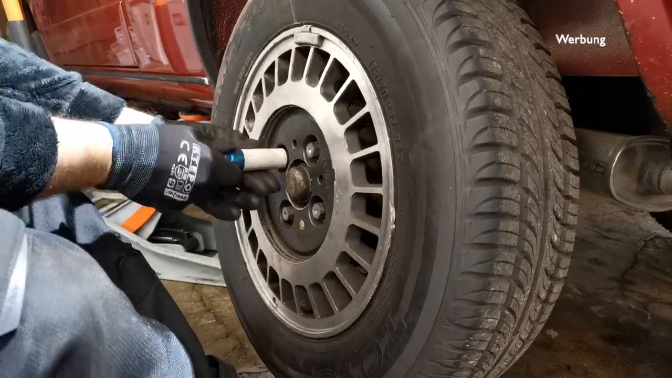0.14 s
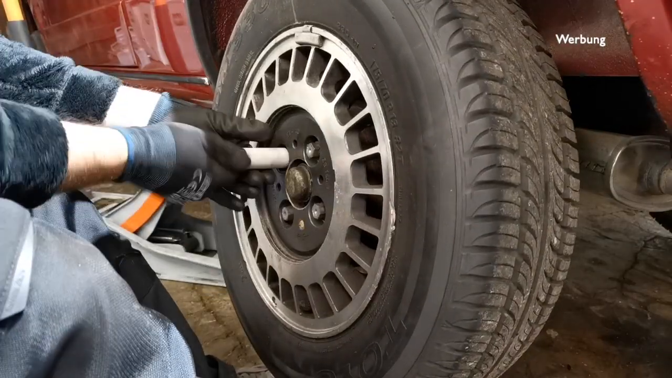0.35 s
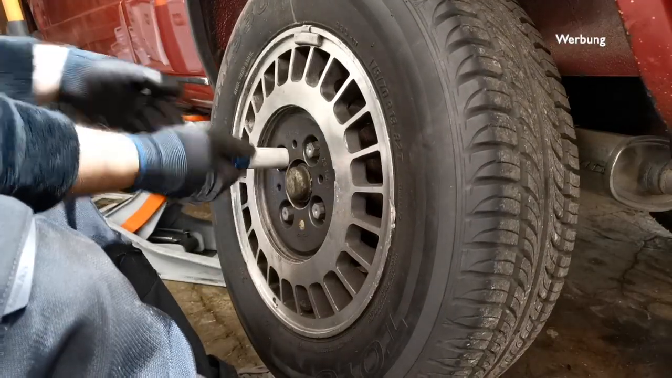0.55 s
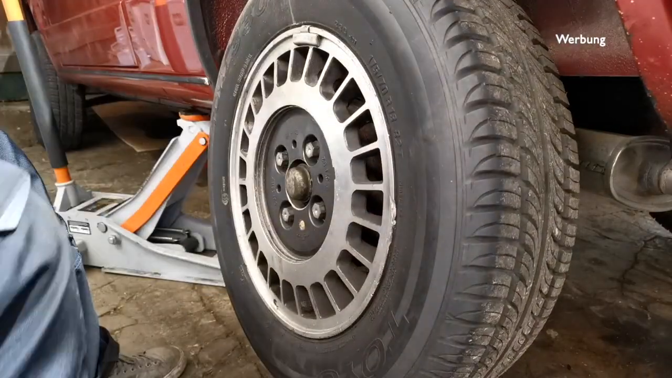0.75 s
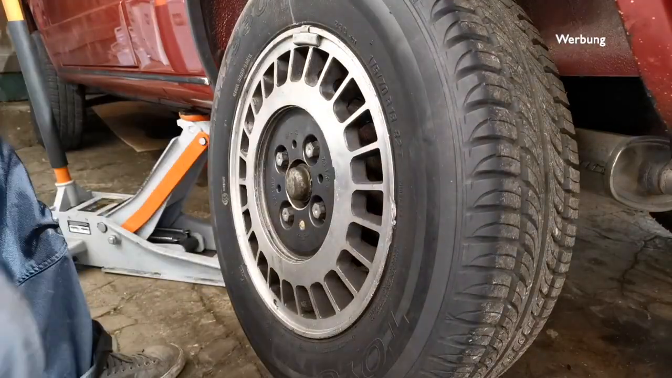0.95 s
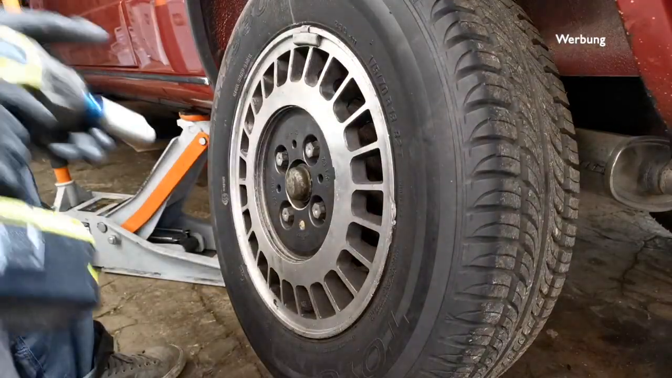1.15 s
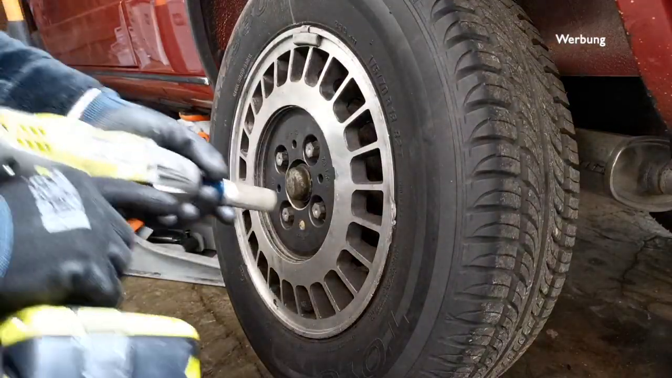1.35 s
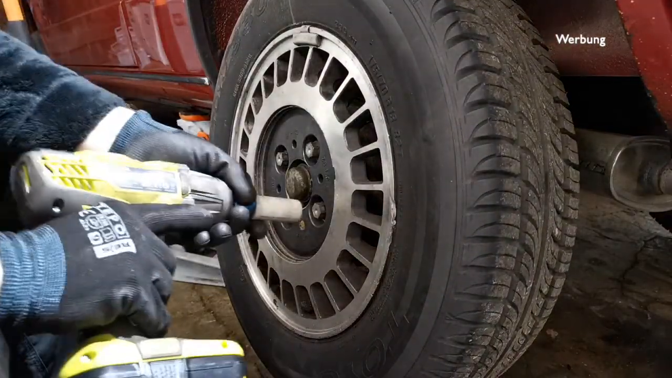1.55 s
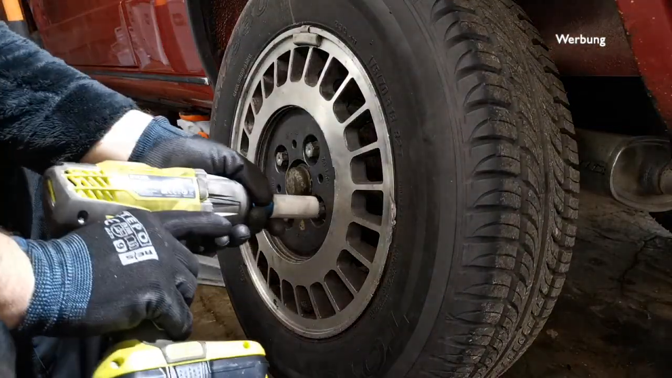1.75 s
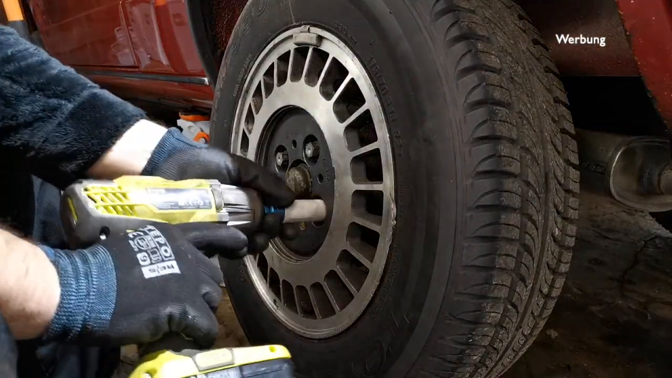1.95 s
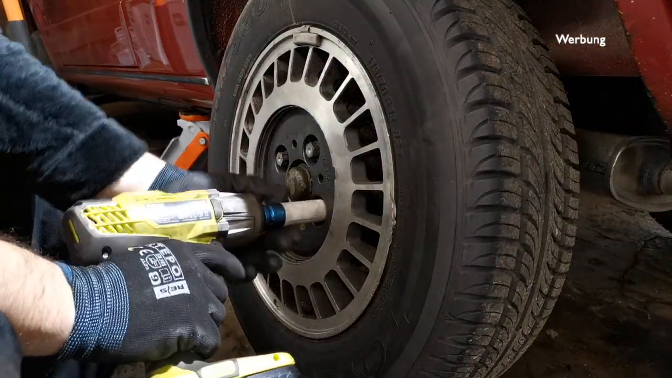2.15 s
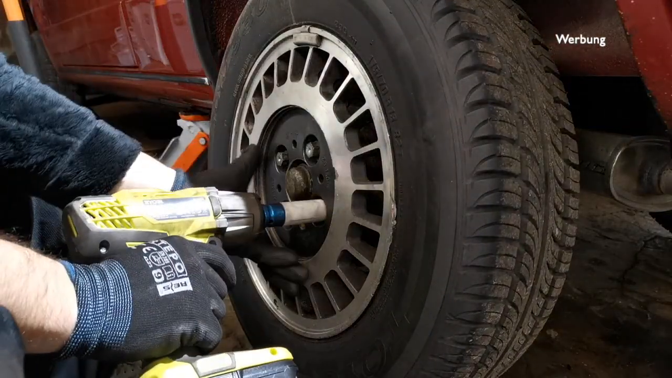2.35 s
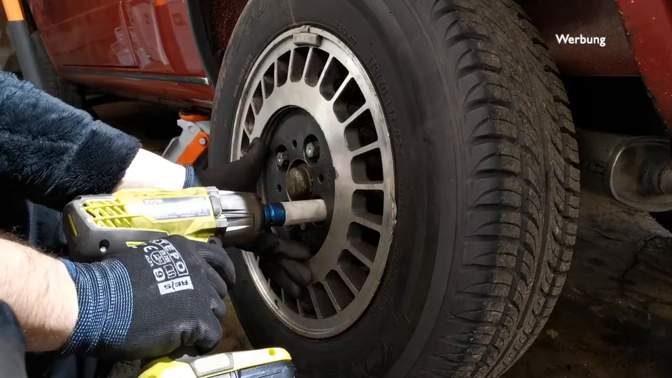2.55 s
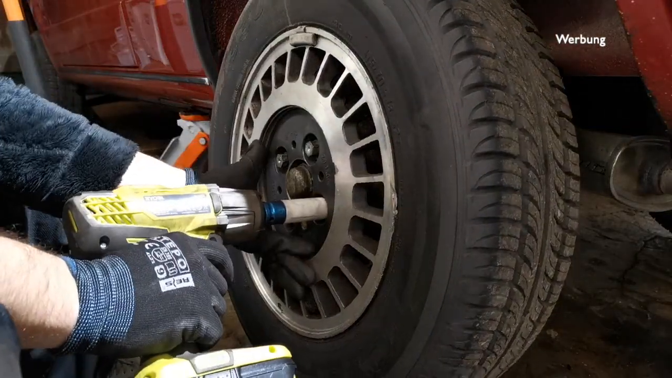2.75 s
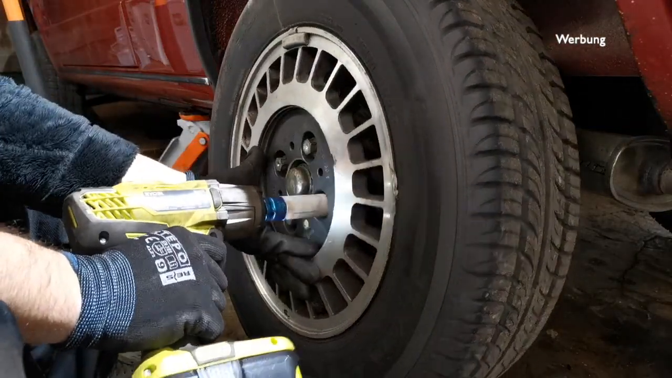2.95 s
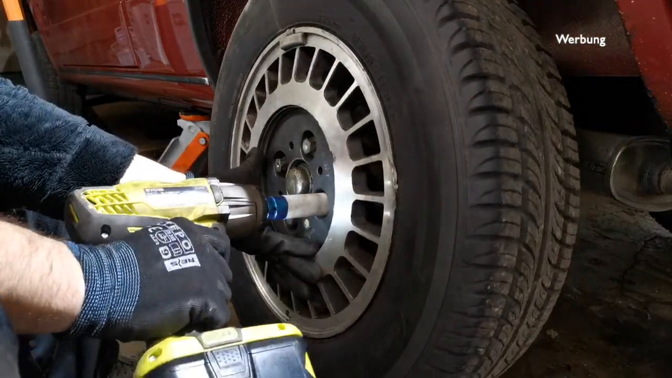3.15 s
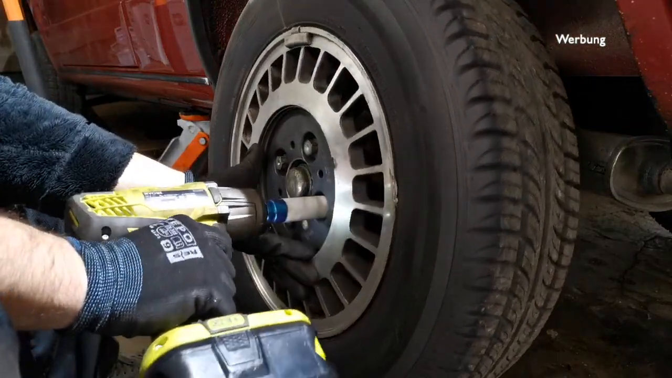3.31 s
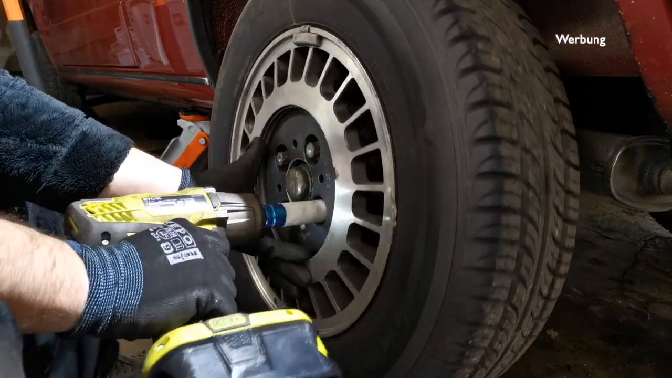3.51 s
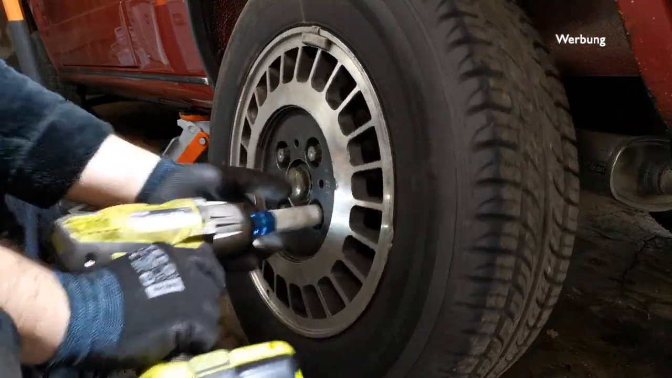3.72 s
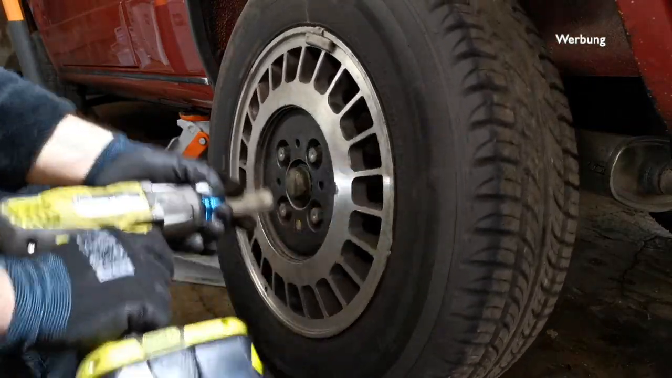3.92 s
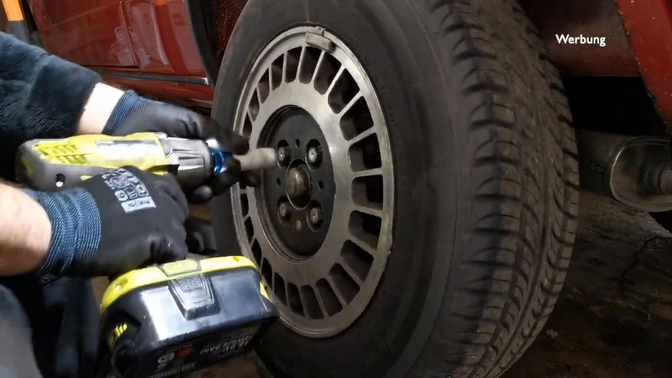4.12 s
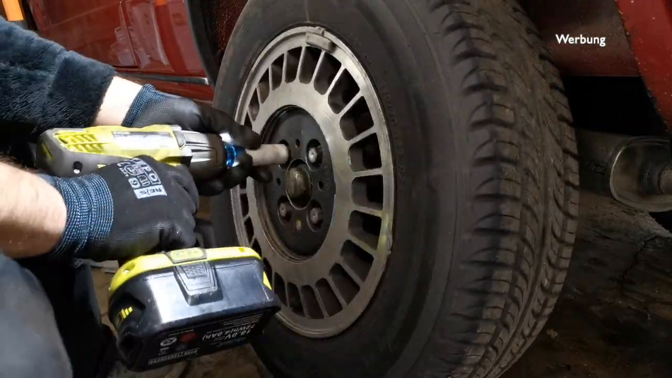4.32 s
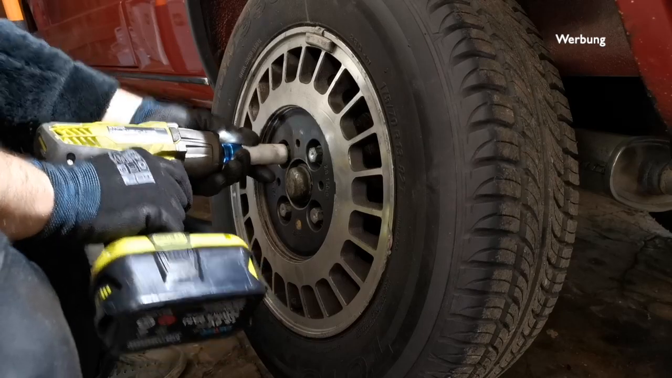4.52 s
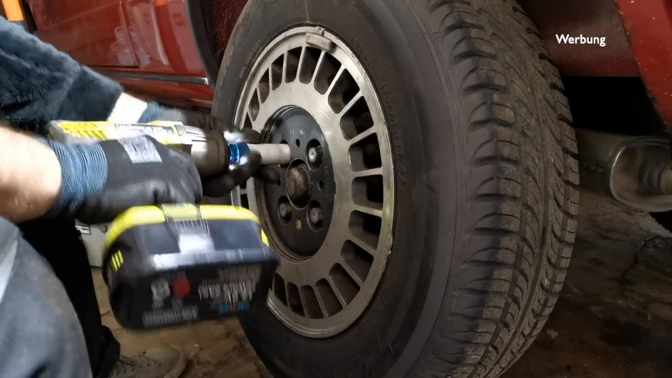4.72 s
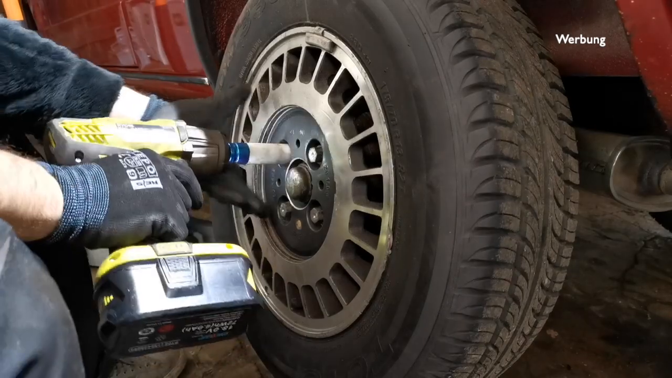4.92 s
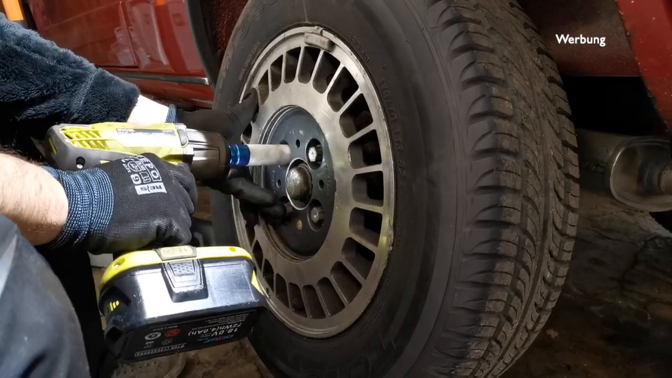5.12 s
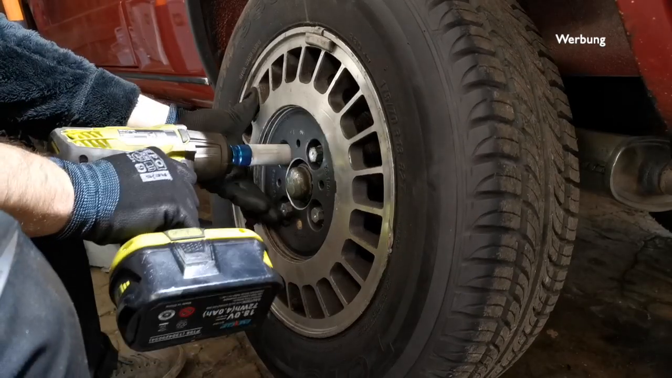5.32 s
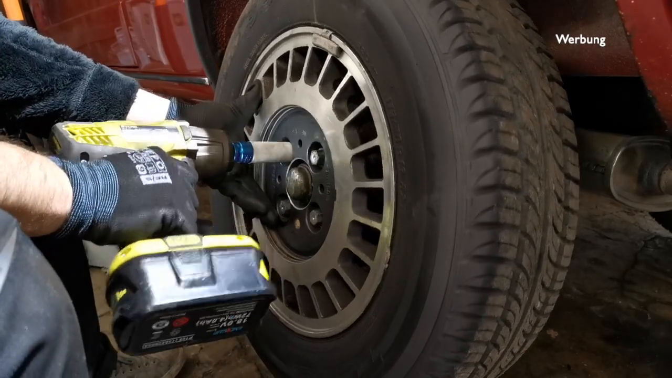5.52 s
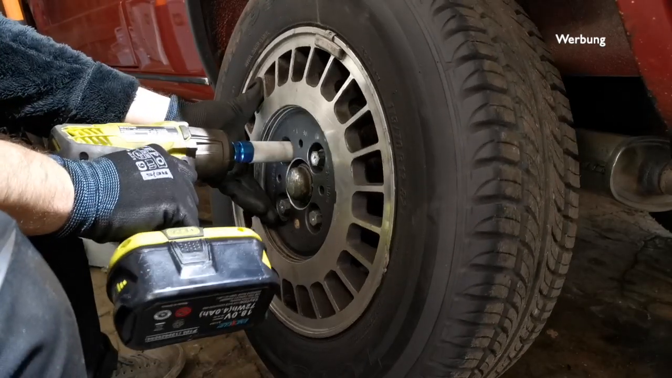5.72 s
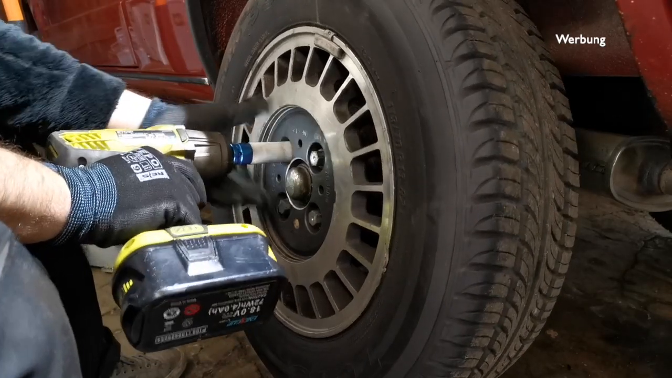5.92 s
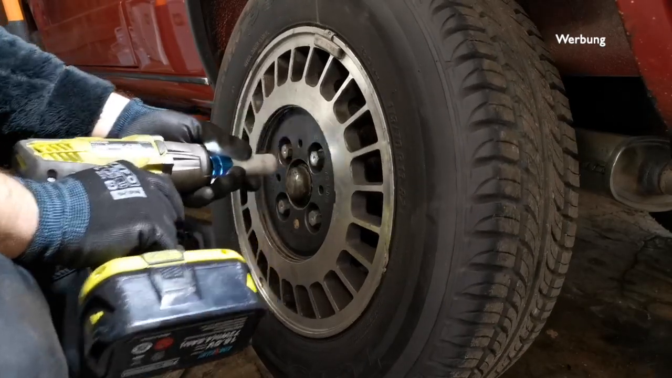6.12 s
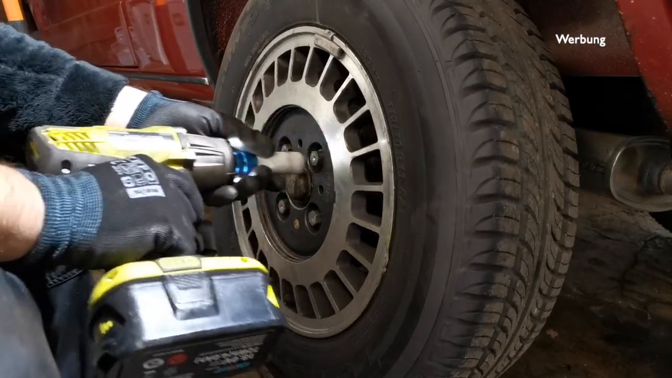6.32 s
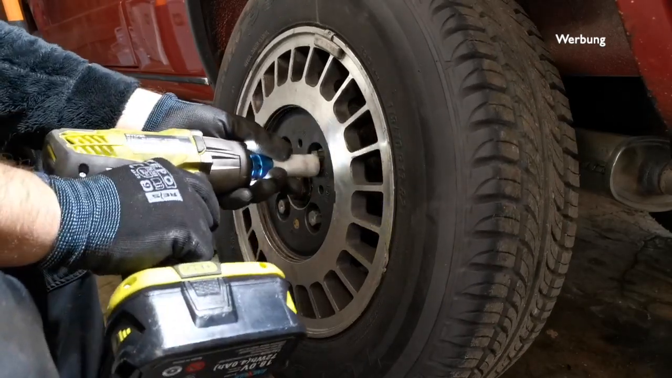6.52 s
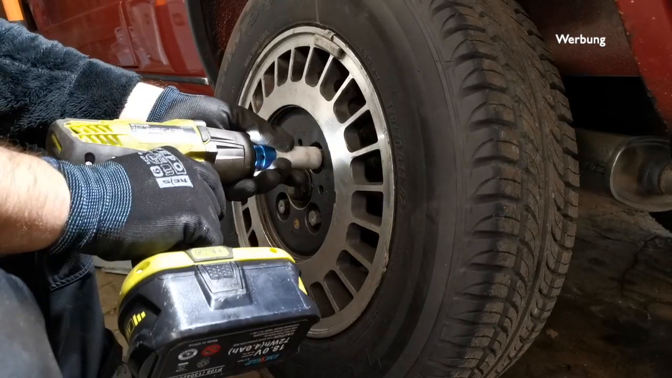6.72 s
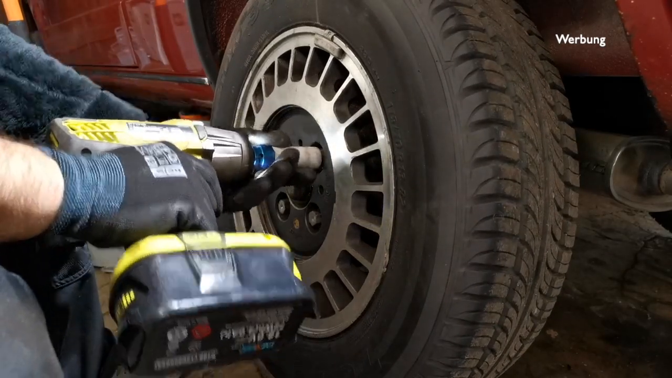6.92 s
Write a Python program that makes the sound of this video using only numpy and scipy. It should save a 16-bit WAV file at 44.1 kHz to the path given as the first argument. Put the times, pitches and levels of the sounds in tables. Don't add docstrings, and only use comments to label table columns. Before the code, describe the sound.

Faint finger ticks, a socket clinking into place, then a cordless impact wrench whirs and hammers harshly twice, with tool clatter between bursts.

```python
import sys
import numpy as np
from scipy import signal
from scipy.fft import rfft, irfft, next_fast_len
from scipy.io import wavfile
from scipy.ndimage import map_coordinates

SR = 44100
rng = np.random.default_rng(int(sys.argv[2]) if len(sys.argv) > 2 else 0)


def waveform_to_disk(signal):
    frames = np.transpose(np.atleast_2d(signal))
    scaled = np.clip(frames, -1, 1) * 32767
    samples = np.round(scaled).astype(np.int16)
    wavfile.write(sys.argv[1], SR, samples)


def field_ratio(decibels):
    return 10 ** (np.asarray(decibels, dtype=float) / 20)


N = 311346
CHANGE_S = 1.037

# f/Hz, density/dB per Hz
QUIET_SPECTRUM = [(25, -12), (60, -8), (145, -4.5), (230, -10), (320, -2.5), (600, -6), (900, -7),
                  (2000, -11), (5000, -9), (12000, -8.5), (16000, -9.5)]
# t/s, level/dB
HISS_LEVEL = [(0, -72), (.25, -71), (.35, -70.5), (.65, -70), (1.0, -70)]
# f/Hz, level/dB
BALLAST_TONE = [(12947, -94)]

# f/Hz, density/dB per Hz
TRAFFIC_SPECTRUM = [(15, -21.5), (30, -2), (60, -1), (100, -9.5), (114, -3), (130, -7), (160, -6),
                    (250, -14.5), (500, -38.5)]
# t/s, level/dB
TRAFFIC_LEVEL = [(1.0, -83), (1.3, -77), (1.8, -72), (2.05, -76), (2.55, -71), (2.9, -78.5), (4.4, -72.5),
                 (4.95, -75.5), (6.0, -70), (6.4, -76), (7.06, -78.5)]
# f/Hz, level/dB, unsteadiness/dB
FRIDGE_HUM = (113, -81, 2.5)
# f/Hz, density/dB per Hz
AIR_SPECTRUM = [(120, -29), (200, -2.5), (334, -6.5), (424, 0), (473, -7), (548, -2), (1620, -2.5),
                (15100, -27), (16000, -27.5)]
AIR_DB, AIR_FOLLOWS, CALM_DB = -69, 0.3, -76

# f/Hz, density/dB per Hz
CLOTH_SPECTRUM = [(180, -32.5), (300, -7), (448, -9), (1120, -4), (1220, -3), (3140, -6), (6580, -8),
                  (14000, -22)]
# t/s, level/dB
ARM_MOTION = [(1.0, -63.5), (1.5, -67), (1.8, -73), (2.15, -70), (2.35, -68), (2.55, -74.5), (4.2, -77),
              (4.65, -69), (4.95, -75.5), (5.2, -74), (7.06, -79)]
# f/Hz, density/dB per Hz
SLEEVE_SPECTRUM = [(2000, -39), (6000, -7), (12500, 1), (16000, -1.5)]
SLEEVE_DB, SLEEVE_FOLLOWS, STILL_DB = -86, 0.5, -76
# t/s, half length/s, level/dB
SLEEVE_PASS = (2.36, .09, -75)

# f/Hz, t60/s
GARAGE_DECAY = [(35, .8), (70, 0.5), (250, 0.69), (500, .6), (2700, 0.59), (5400, 0.51), (8000, 0.44),
                (11000, .36), (13500, 0.3), (16000, .31)]
TAIL = int(0.9 * SR)

# t/s, peak level/dB, centre f/Hz, width/octaves
FINGER_TICKS = [(.047, -62, 11500, .3), (.148, -58, 13500, .5), (.26, -63, 12000, .8), (.295, -69, 870, .2),
                (.31, -65, 2000, 0.1474), (.36, -74, 315, 0.057), (.41, -71, 880, .5), (.47, -68, 900, .5),
                (.6, -66, 850, .54), (.646, -61, 2300, .67), (.66, -58, 9000, 1.1),
                (.708, -53, 3500, 1.262), (.712, -65, 1040, .3), (.78, -69, 495, 0.0565),
                (.793, -62, 3500, 1.6), (.827, -52, 12760, 0.9), (.9, -54, 5960, 1.9),
                (.932, -43.5, 8950, 2.8), (.933, -76, 400, 0.72), (.97, -62, 7000, 1.2)]
# t/s, peak level/dB, centre f/Hz, width/octaves
SOCKET_FITTING = [(1.063, -51.5, 6500, 0.58), (1.135, -54, 6500, 0.7), (1.29, -57, 6300, .4),
                  (1.455, -55, 2200, .9), (1.527, -35.5, 3400, 1.3), (1.529, -44, 13000, 0.78),
                  (1.535, -44.5, 8210, .25), (1.855, -44.5, 1780, 1.1), (1.862, -52, 3300, .6),
                  (1.88, -45, 2500, 0.26), (1.885, -47.5, 1040, 0.93), (1.92, -52, 1500, 1.5),
                  (1.96, -47, 884, 1.8), (2.481, -50, 4500, 1.7), (2.884, -53, 7500, 0.55),
                  (2.9, -63, 5450, .3)]
# t/s, peak level/dB, centre f/Hz, width/octaves
BURST_JOLTS = [
    (3.05, -36, 156, .3),
    (3.229, -19.5, 10970, .9),
    (5.34, -35.5, 150, 0.39),
    (5.5, -32.5, 152, .35),
    (5.591, -23.5, 11000, 0.76),
]
# t/s, peak level/dB, centre f/Hz, width/octaves
TOOL_SHIFTING = [(4.2975, -43, 1700, 1.3), (4.3124, -36, 1200, 1.4), (4.32, -42, 3400, 0.34),
                 (4.319, -44, 6100, 0.32), (4.313, -55, 8370, 0.6), (4.3135, -52, 13500, .5),
                 (4.32, -54, 141, 0.48), (4.33, -35.5, 1150, 1.1), (4.507, -58, 8302, 0.28),
                 (4.508, -56.5, 3500, 1), (4.6, -51.5, 1097, 0.78), (4.765, -53.5, 5500, 1.2),
                 (4.794, -52, 8310, .25), (4.946, -54, 600, 1.2), (4.975, -61, 400, 1.1),
                 (4.995, -60, 350, 1.2), (5.173, -50.5, 5960, .6), (6.465, -59, 481, 0.37),
                 (6.56, -57, 300, 0.91), (6.6268, -51, 1800, 1.1), (6.6505, -51, 1200, 0.87),
                 (6.651, -51, 3010, 1.2), (6.665, -62, 2800, 0.9)]
# f/Hz, level/dB
SCRAPE_LEVEL = [(200, -32.5), (1000, -20), (2500, -15.5), (5000, -12), (12000, -12.5)]
RING_CYCLES = 8.2
# t/s, peak level/dB, f/Hz, t60/s
STRUCK_PARTS = [(4.301, -47, 770, .04), (4.313, -41, 663, .065), (4.313, -42, 1754, 0.042),
                (4.313, -46, 3800, 0.024), (4.313, -44, 6000, 0.023), (4.313, -50, 8300, .02),
                (4.319, -49, 6100, 0.027), (4.324, -41, 1030, 0.082), (4.328, -49, 1570, 0.035),
                (4.341, -43, 1250, .06), (4.372, -46, 1190, .03), (4.95, -61, 140, .07),
                (4.952, -53, 720, 0.044), (4.953, -60, 320, 0.046), (4.965, -55, 778, .035),
                (4.985, -58, 898, 0.036), (4.994, -61, 302, 0.038), (5.005, -61, 740, .04),
                (5.609, -19.5, 900, .05), (6.627, -48, 1400, 0.055), (6.632, -59, 2450, .04),
                (6.651, -49.5, 1300, 0.058), (6.651, -57, 2800, 0.034), (6.651, -62, 4600, 0.031),
                (6.657, -49.5, 1043, 0.066), (6.665, -52, 1102, 0.037), (6.677, -57, 1450, .05),
                (6.677, -59, 2500, .04), (6.695, -56, 1290, .05)]

# f/Hz, t60/s, levels at each bolt/dB
TYRE_CAVITY = (252, 2.1, [-84.5, -77])
# t/s, peak level/dB, f/Hz
SPOKE_BLOWS = [
    [(3.0144, -12.5, 2790), (3.0383, -6, 3790), (3.0757, -8, 2796), (3.0887, -6, 3520), (3.1351, -7, 3740), (3.1516, -4.5, 2510), (3.2194, -12, 2590), (3.2359, -7, 2640), (3.2643, -2.5, 4580), (3.2902, -5, 3680), (3.3386, -3, 2833), (3.3626, -2, 2390), (3.4469, -5, 2930), (3.4833, -5.5, 4340), (3.5117, -2, 4550), (3.5382, -4, 4570), (3.5651, -3.5, 3410), (3.5826, -2.5, 3550), (3.6045, -1.5, 4270)],
    [(5.3343, -4.5, 2650), (5.3548, -3, 1820), (5.3837, -4, 2720), (5.4076, -3.5, 3010), (5.4341, -3, 3500), (5.4495, -1, 2226), (5.5533, -11.5, 2350), (5.5832, -12, 2460), (5.5982, -7.5, 3600), (5.6271, -1, 3990), (5.6526, -2, 3410), (5.681, -0.5, 2756), (5.702, -1, 2790), (5.7309, -1, 2845), (5.7539, 0, 2816), (5.7748, 0.5, 3750), (5.7983, 1, 4560), (5.8466, -3.5, 2800)],
]
SPOKE_DB, SPOKE_T60_S, SPOKE_RISE_S = -4.5, 0.038, 0.002

# start t/s, end t/s, start f/Hz, end f/Hz, level/dB
GEAR_MESH = [(2.95, 2.985, 2500, 2460, -46.5), (2.957, 2.99, 2820, 2900, -44),
             (2.953, 2.972, 2080, 2100, -52), (2.985, 3.02, 700, 720, -45), (2.99, 3.02, 2350, 2400, -40),
             (2.99, 3.04, 2860, 2780, -33.5), (2.99, 3.025, 3740, 3630, -40), (3.01, 3.03, 2080, 2090, -37),
             (5.236, 5.265, 2290, 2230, -45), (5.24, 5.265, 2970, 2950, -39),
             (5.245, 5.292, 2660, 2630, -36), (5.252, 5.272, 2030, 2010, -42),
             (5.262, 5.298, 2490, 2450, -36), (5.262, 5.28, 3390, 3410, -39),
             (5.275, 5.3, 2950, 3010, -35.5), (5.268, 5.296, 900, 915, -48.5),
             (5.294, 5.328, 1040, 1290, -43.5), (5.292, 5.306, 2250, 2250, -29.5),
             (5.291, 5.31, 3380, 3400, -29), (5.306, 5.323, 2260, 2220, -36)]
# t/s, level/dB
TRIGGER_PULLS = [
    [(2.94, -66), (2.962, -42.5), (3.03, -28.5), (3.16, -25.5), (3.22, -36.5), (3.39, -16.5), (3.43, -25.5),
     (3.655, -12.5), (3.7, -39)],
    [(5.226, -66), (5.243, -43), (5.275, -34), (5.32, -32.5), (5.53, -15.5), (5.57, -32), (5.7, -21),
     (5.905, -12.5), (5.945, -37)],
]
# f/Hz, density/dB per Hz
GEAR_SPECTRUM = [(59, -57), (100, -28.5), (648, -22), (910, -15), (1480, -18.5), (2220, -3.5), (3470, -8.5),
                 (4020, -13), (5000, -13), (8460, -16), (9610, -23.5), (16000, -28)]
# f/Hz, width/Hz, level/dB
HOUSING_MODES = [(2260, 47, -2), (2850, 160, -0.5), (3400, 43, 3.5), (4500, 49, -13)]
# f/Hz, density/dB per Hz
STRAIN_SPECTRA = [
    [(59, -60), (100, -32), (1330, -10), (2130, -8.5), (3050, -3), (3940, -14), (6290, 1), (13200, -26), (16000, -24)],
    [(59, -49), (100, -16), (289, -21.5), (1080, -10.5), (1420, -4), (4770, 0), (8460, -1.5), (14400, -25), (16000, -25.5)],
]
SPEED_DB, FIZZ_GROWS, FIZZ_HZ = -36, 0.15, 3890

# t/s, peak level/dB, dullness/dB, socket f/Hz
FIRST_BLOWS = [(2.9761, -14.5, 3.5, 5274), (3.0316, -10, 4.5, 8550), (3.039, 3, 3, 7908),
               (3.0778, 3.5, -1, 7900), (3.0889, -2.5, -1, 6047), (3.1356, -3.5, -0.5, 5210),
               (3.1519, 2.5, 4, 8076), (3.237, 6.5, -2, 6020), (3.265, 8.5, -0.5, 6430),
               (3.2909, 5, 1, 6370), (3.3148, 6.5, 1, 6280), (3.3392, 7.5, 1, 6325),
               (3.364, 2.5, -3.5, 6285), (3.3745, 1, -1.5, 7250), (3.4473, 4, 0.5, 7493),
               (3.4584, 2, -2.5, 7770), (3.4847, 6, -1, 5150), (3.5127, 8.5, -0.5, 5400),
               (3.5376, 7, -2.5, 5600), (3.562, 6, -3.5, 7990), (3.5847, 6.5, -1.5, 5470),
               (3.6073, 7, -4, 7000), (3.6319, 1, 1.5, 6260)]
# t/s, peak level/dB, dullness/dB, socket f/Hz
SECOND_BLOWS = [(5.3234, -11.5, 3, 8600), (5.3306, 3, 5, 8550), (5.3551, 4.5, 2.5, 5700),
                (5.3794, 1.5, 4, 7800), (5.4029, 5.5, 1, 8380), (5.427, 2.5, -5, 6700),
                (5.4507, 6, 3, 5170), (5.476, 1.5, -1, 8560), (5.502, -2.5, 5.5, 4640),
                (5.5215, -12.5, -1.5, 4520), (5.599, 1, 5.5, 8370), (5.6271, 4.5, 4.5, 8470),
                (5.6537, 3.5, 0, 8030), (5.678, 4, 1, 2850), (5.7022, 4, 4, 8220), (5.7273, 5, -2, 8260),
                (5.7513, 5, -1, 3007), (5.7747, 3.5, 2, 4860), (5.799, 3.5, 1.5, 4700),
                (5.823, 7, -3.5, 5350), (5.8476, 6, -7, 6020), (5.8791, 0, -13.5, 5508)]
# f/Hz, density/dB per Hz
BLOW_SPECTRA = [
    [(18, -39.5), (36, -21), (70, -26), (319, -24), (540, -14), (600, -21), (721, -13), (1190, -11.5), (2290, -7), (4300, -5.5), (6210, -1.5), (8300, -3.5), (9710, -13), (13700, -17.5), (16000, -21.5)],
    [(18, -38.5), (36, -19), (70, -26), (194, -28.5), (239, -16.5), (345, -21.5), (486, -13), (1720, -5), (2750, -1.5), (5450, 0.5), (6900, -3), (8520, -2), (9970, -11), (14000, -11.5), (16000, -21.5)],
]
# f/Hz, width/Hz, level/dB
RIM_MODES = [
    [(2440, 34, -1.5), (3166, 120, -4.5), (3500, 63, -3), (4160, 62, -4.5), (5200, 100, -14.5), (5470, 210, 5), (6560, 260, -1.5), (7300, 67, -8.5), (7990, 110, -4)],
    [(2790, 73, 3.5), (3530, 110, 3.5), (4310, 21, -11.5), (4930, 42, -6.5), (5350, 92, 0), (6700, 110, -3), (7800, 32, -6.5), (9260, 110, -4)],
]
PANELS_HZ = np.geomspace(60, 16000, num=150)
REBOUND_DB, REBOUND_SHRINKS, REBOUND_SCATTER_DB = -5.5, 0.24, 1
SOCKET_DB, SOCKET_DULLS = -3.5, 0.27

TOP_HZ, FULL_SCALE = 16050, 0.97


def unit(x):
    return x / np.sqrt(np.mean(x ** 2) + 1e-20)


def along(points, hz):
    f, v = np.transpose(points)
    return np.interp(np.log(hz + 1), np.log(f + 1), v)


def curve(rows):
    rows = np.array(rows)
    return np.interp(np.arange(N) / SR, rows[:, 0], rows[:, 1], left=-150)


def wobble(rate):
    knots = rng.standard_normal(int(N * rate / SR) + 4)
    return map_coordinates(knots, [np.arange(N) * rate / SR])


def coloured(x, db_of_hz):
    m = next_fast_len(x.shape[-1] + 4096)
    log_gain = np.log(field_ratio(db_of_hz(np.fft.rfftfreq(m, 1 / SR))) + 1e-6)
    cepstrum = irfft(log_gain, m)
    cepstrum[1:m // 2] *= 2
    cepstrum[m // 2 + 1:] = 0
    gain = np.exp(rfft(cepstrum))
    gain = gain / np.sqrt(np.mean(abs(gain) ** 2))
    return irfft(rfft(x, m) * gain, m)[..., :x.shape[-1]]


def bumps(modes, hz, lift_db):
    return sum(max(lift_db + db, 0) / (1 + (2 * (hz - c) / w) ** 2) for c, w, db in modes)


def echo(build_s):
    hz, t, z = signal.stft(rng.standard_normal(TAIL), SR, nperseg=256)
    decay = field_ratio(-60 * t / along(GARAGE_DECAY, hz)[:, None])
    tail = signal.istft(z * decay, SR, nperseg=256)[1][:TAIL]
    tail = tail * (1 - np.exp(-np.arange(len(tail)) / SR / build_s))
    return tail / np.linalg.norm(tail)


def add(track, s, sound):
    part = track[round(s * SR):][:len(sound)]
    part += sound[:len(part)]


def noise(spectrum, grain):
    return unit(coloured(grain * rng.standard_normal(N), lambda hz: along(spectrum, hz)))


def background():
    t = np.arange(N) / SR
    before = np.clip((CHANGE_S - t) / 0.021, 0, 1)
    hiss = field_ratio(curve(HISS_LEVEL) + 0.58 * wobble(5.1)) * noise(QUIET_SPECTRUM, 1)
    lamps = sum(field_ratio(db + 4.9 * wobble(4)) * np.sin(2 * np.pi * hz * t) for hz, db in BALLAST_TONE)

    traffic_db, rustle_db = curve(TRAFFIC_LEVEL), curve(ARM_MOTION)
    rumble = field_ratio(traffic_db + 1.4 * wobble(1.5)) * noise(TRAFFIC_SPECTRUM, 1)
    hum_hz, hum_db, unsteady_db = FRIDGE_HUM
    hum = field_ratio(hum_db + unsteady_db * wobble(5.0)) * np.sin(2 * np.pi * hum_hz * t + 0.8 * wobble(9))
    air_db = AIR_DB + AIR_FOLLOWS * (traffic_db - CALM_DB)
    air = field_ratio(air_db + 0.8 * wobble(2)) * noise(AIR_SPECTRUM, 1)

    crackle = field_ratio(0.9 * wobble(30) + 1.9 * wobble(300))
    rustle = field_ratio(rustle_db) * noise(CLOTH_SPECTRUM, crackle)
    pass_s, half_s, pass_db = SLEEVE_PASS
    brush = field_ratio(pass_db - 9 * ((t - pass_s) / half_s) ** 2)
    sleeve_level = field_ratio(SLEEVE_DB + SLEEVE_FOLLOWS * (rustle_db - STILL_DB)) + brush
    sleeve = sleeve_level * noise(SLEEVE_SPECTRUM, field_ratio(1.5 * wobble(60)))
    return before * (hiss + lamps) + (1 - before) * (rumble + hum + air + rustle + sleeve)


def touches(events, wet_db, contact_s):
    out, t = np.zeros(N), np.arange(12000) / SR
    scrape_tilt = [(100, -10), (700, 9.5), (5000, -4.5), (16000, -20.0)]
    for s, db, centre_hz, octaves in events:
        broad_db = along(SCRAPE_LEVEL, centre_hz)
        t60 = contact_s + RING_CYCLES / (centre_hz * octaves)

        def colour(hz):
            hump = field_ratio(-12 * (np.log2((hz + 1) / centre_hz) / octaves) ** 2)
            return 20 * np.log10(hump + field_ratio(broad_db + along(scrape_tilt, hz)))

        shape = field_ratio(-60 * t / t60) * (1 - np.exp(-t / 0.0012))
        burst = unit(coloured(shape * rng.standard_normal(len(t)), colour))
        burst = burst * np.sqrt(np.mean(shape ** 2))
        tail = coloured(echo(build_s=0.006), colour)
        tail = tail * np.linalg.norm(burst) / np.linalg.norm(tail)
        add(out, s, field_ratio(db - 3.5) * burst)
        add(out, s, field_ratio(db - 5.0 + wet_db) * tail)
    return out


def rings():
    out, t = np.zeros(N), np.arange(SR // 4) / SR
    for s, db, hz, t60 in STRUCK_PARTS:
        mode = field_ratio(db - 60 * t / t60) * np.sin(2 * np.pi * hz * t) * (1 - np.exp(-t / 0.0006))
        add(out, s, mode)
        add(out, s, field_ratio(-8) * signal.fftconvolve(mode, echo(build_s=0.006)))
    return out


def tyre():
    hz, t60, levels_db = TYRE_CAVITY
    swell, t = np.zeros(N), np.arange(SR) / SR
    for blows, db in zip((FIRST_BLOWS, SECOND_BLOWS), levels_db):
        for s, blow_db, *_ in blows:
            add(swell, s, field_ratio(db + blow_db - 60 * t / t60))
    tone = np.sin(2 * np.pi * hz * np.arange(N) / SR + 0.5 * wobble(12))
    return swell * field_ratio(1.5 * wobble(6.4)) * tone


def spokes():
    out, t = np.zeros(N), np.arange(SR // 8) / SR
    rise = 1 - np.exp(-t / SPOKE_RISE_S)
    for s, db, hz in SPOKE_BLOWS[0] + SPOKE_BLOWS[1]:
        decay = field_ratio(db + SPOKE_DB - 60 * t / SPOKE_T60_S)
        add(out, s, decay * np.sin(2 * np.pi * hz * t) * rise)
    return out + field_ratio(-8) * signal.fftconvolve(out, echo(build_s=0.005))[:N]


def whine():
    out = np.zeros(N)
    for start, end, from_hz, to_hz, db in GEAR_MESH:
        u = np.linspace(0, 1, round((end - start) * SR))
        phase = 2 * np.pi * (np.cumsum(from_hz + (to_hz - from_hz) * u) / SR + rng.random())
        swell = np.sin(np.pi * u ** 0.69) ** 0.73
        add(out, start, field_ratio(db + 1.5) * np.sin(phase) * swell)
    out = out * field_ratio(1.8 * wobble(150))
    return out + field_ratio(-13) * signal.fftconvolve(out, echo(build_s=0.008))[:N]


def motor():
    teeth = rng.standard_normal(N) * field_ratio(0.56 * wobble(450) + 0.73 * wobble(90))
    gearbox = lambda hz: along(GEAR_SPECTRUM, hz) + bumps(HOUSING_MODES, hz, lift_db=2.0)
    whirr = unit(coloured(teeth, gearbox))
    fizz = signal.sosfilt(signal.butter(4, FIZZ_HZ, 'high', fs=SR, output='sos'), whirr)
    body = signal.sosfilt(signal.butter(4, FIZZ_HZ, 'low', fs=SR, output='sos'), whirr)
    out, t = np.zeros(N), np.arange(N) / SR
    for pull, strain in zip(TRIGGER_PULLS, STRAIN_SPECTRA):
        buzz = unit(coloured(teeth[::-1], lambda hz: along(strain, hz)))
        level_db = np.where(t < pull[-1][0], curve(pull), -150)
        load = np.clip((level_db + 27.5) / 9, 0, 1)
        gears = body + field_ratio(FIZZ_GROWS * np.minimum(level_db - SPEED_DB, 0)) * fizz
        direct = field_ratio(level_db) * (np.sqrt(1 - load) * gears + np.sqrt(load) * buzz)
        out += direct + field_ratio(-7.0) * signal.fftconvolve(direct, echo(build_s=0.006))[:N]
    return out


def impact_shape(t, db):
    rebound_db = REBOUND_DB - REBOUND_SHRINKS * db + REBOUND_SCATTER_DB * rng.standard_normal()
    seat_s = 0.0065 * (1 + 0.1 * rng.standard_normal())
    late = np.clip(t - seat_s, 0, None)
    crack = field_ratio(2.5 - 60 * t / 0.008)
    rattle = field_ratio(-7 - 60 * t / 0.16) / (1 + np.exp((t - seat_s - 0.003) / 0.0012))
    rebound = (late > 0) * field_ratio(min(rebound_db, 1) - 60 * late / 0.013)
    return crack + rattle + rebound


def rim_ring(t, rim):
    ring = np.zeros(len(t))
    for hz, _, level_db in rim:
        decay = field_ratio(level_db + rng.normal(0, 5) - 60 * t / 0.026)
        ring += decay * np.sin(2 * np.pi * hz * (1 + 0.029 * rng.standard_normal()) * t)
    return ring


def hammer(blows, clang, rim):
    out, t = np.zeros(N), np.arange(2600) / SR
    thinning = [(200, -6.0), (2000, -5.5), (4200, -4.5), (8000, -1.5), (13000, 1.0)]
    lean = [(100, 3.4), (1000, 0.44), (2500, -0.5), (8000, 0.45), (13000, 1.1)]
    for s, db, dull_db, socket_hz in blows:
        socket_db = SOCKET_DB - SOCKET_DULLS * dull_db
        tilt = lambda hz: along(clang, hz) + along([(1500, dull_db), (6000, 0.001)], hz)
        thin = lambda hz: tilt(hz) + along(thinning, hz)
        socket = lambda hz: -20 * np.log10(1 + ((hz - socket_hz) / 450) ** 2)

        shape = impact_shape(t, db)
        knocks = shape * rng.standard_normal((2, len(t)))
        knocks *= np.linalg.norm(shape[:88]) / np.linalg.norm(knocks[:, :88], axis=1, keepdims=True)
        ping = field_ratio(2.5 - 60 * t / 0.012) * np.sin(2 * np.pi * socket_hz * t)
        blow = coloured(knocks[0], thin) + field_ratio(socket_db) * coloured(knocks[1], socket)
        blow = blow + field_ratio(-14) * rim_ring(t, rim) + ping
        blow = blow * (1 - np.exp(-t / 0.00032))

        uneven = np.transpose([PANELS_HZ, 2.2 * rng.standard_normal(len(PANELS_HZ))])

        def hall(hz):
            smooth = tilt(hz) + along(uneven, hz) + along(lean, hz)
            socket_hump = bumps([(socket_hz, 900, socket_db)], hz, lift_db=6.0)
            return smooth + bumps(rim, hz, lift_db=-0.85) + socket_hump

        add(out, s, field_ratio(db - 9.0) * blow)
        add(out, s, field_ratio(db + 14.5) * coloured(echo(build_s=0.0045), hall))
    return out


def scene():
    hands = touches(FINGER_TICKS, wet_db=-14, contact_s=0.056)
    hands = hands + touches(SOCKET_FITTING + BURST_JOLTS + TOOL_SHIFTING, wet_db=2.5, contact_s=0.039)
    wheel = rings() + tyre() + spokes()
    blows = hammer(FIRST_BLOWS, BLOW_SPECTRA[0], RIM_MODES[0])
    blows = blows + hammer(SECOND_BLOWS, BLOW_SPECTRA[1], RIM_MODES[1])
    return (background() + hands + wheel + whine() + motor() + blows)[None]


def low_pass(x):
    return signal.sosfilt(signal.butter(12, 16250, fs=SR, output="sos"), x)


def record(dry):
    clipped = dry / (1 + abs(dry / FULL_SCALE) ** 24) ** (1 / 24)
    edge = np.clip((TOP_HZ - np.fft.rfftfreq(N, 1 / SR)) / 300, 0, 1)
    limited = irfft(rfft(clipped) * np.sin(np.pi / 2 * edge) ** 2, N)
    return low_pass(limited)


dry = scene()
out = record(dry)
waveform_to_disk(out)
```